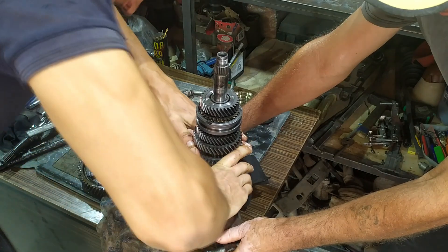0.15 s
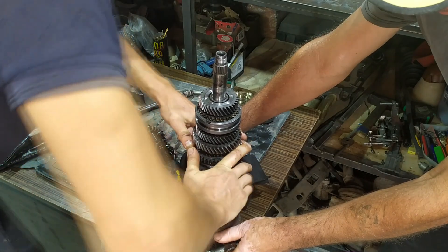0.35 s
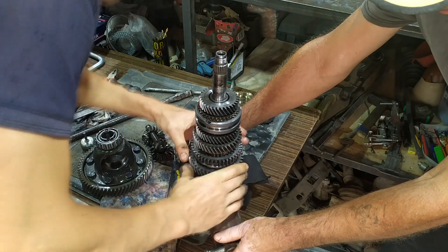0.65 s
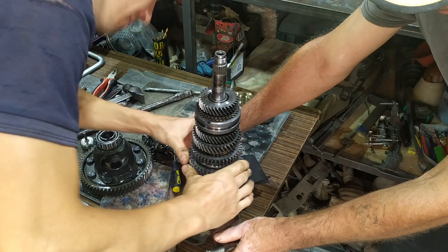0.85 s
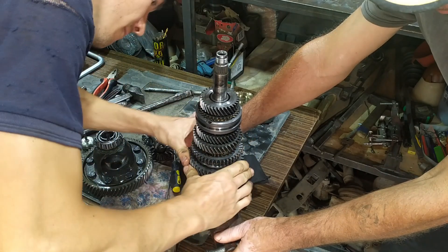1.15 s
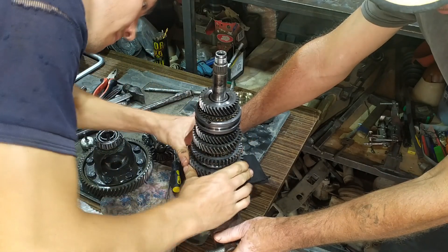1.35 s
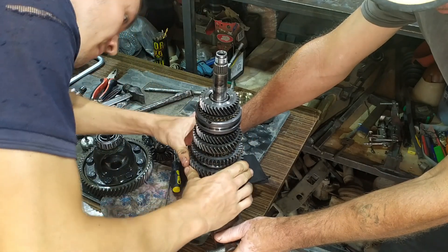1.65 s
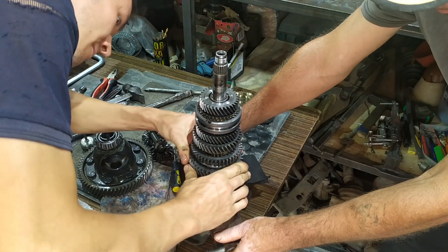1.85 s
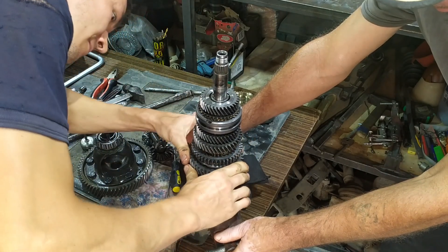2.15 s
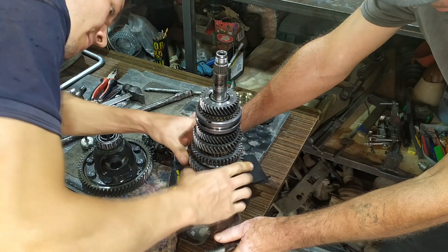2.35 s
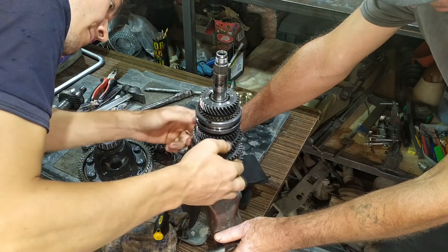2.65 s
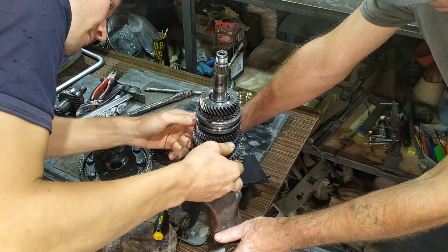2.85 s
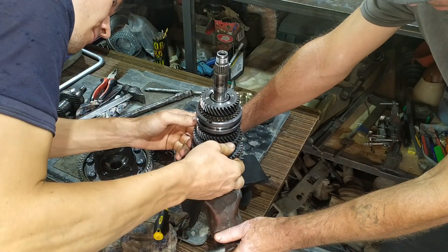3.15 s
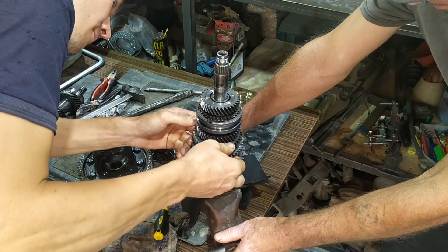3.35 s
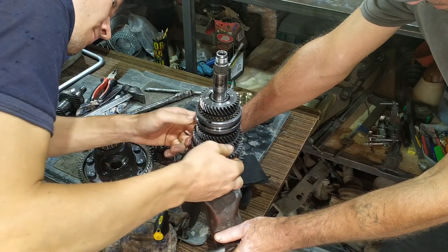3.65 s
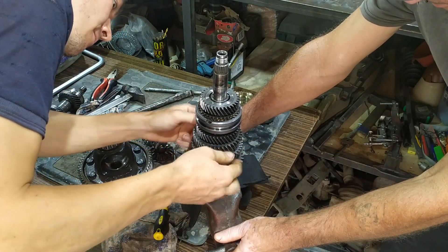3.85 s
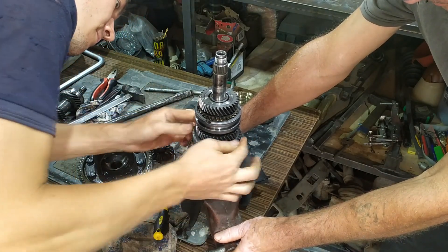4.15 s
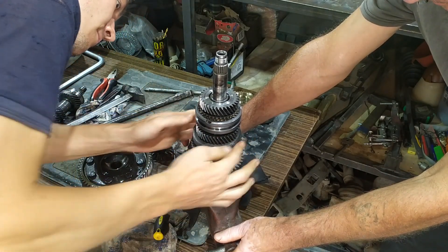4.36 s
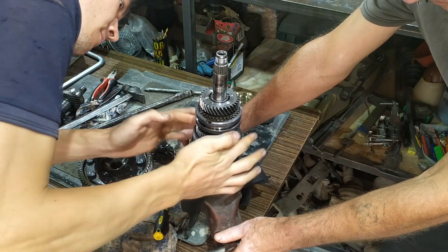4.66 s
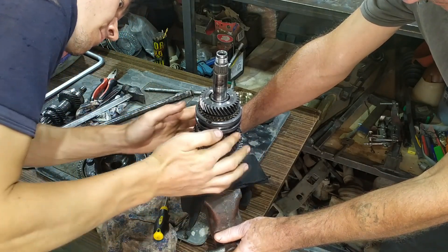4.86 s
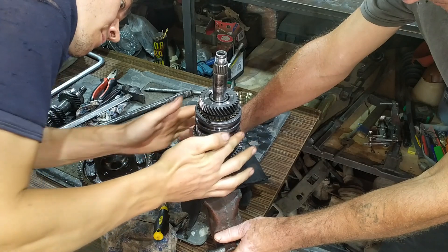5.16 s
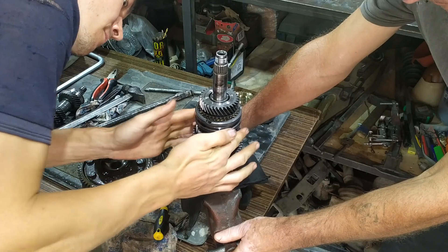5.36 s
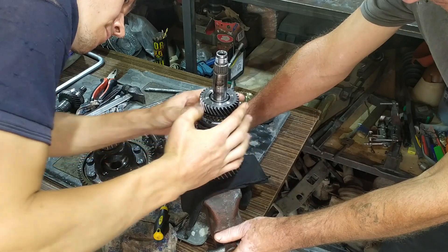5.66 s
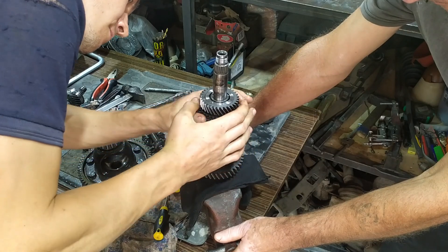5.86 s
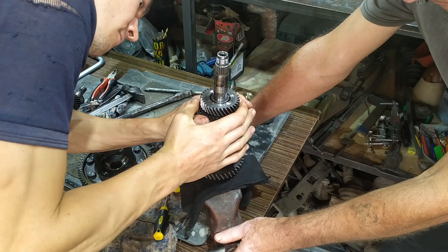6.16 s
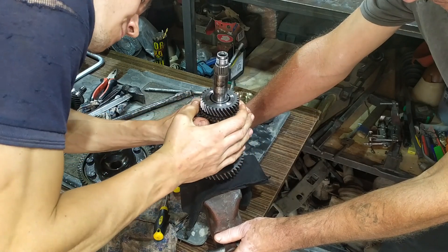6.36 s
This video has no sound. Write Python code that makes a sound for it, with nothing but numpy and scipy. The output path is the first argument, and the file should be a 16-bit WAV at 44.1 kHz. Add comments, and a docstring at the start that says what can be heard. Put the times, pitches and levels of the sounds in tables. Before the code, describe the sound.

A loud, sharp clank of steel gears knocking together opens the sound, left of centre. Hands and cloth scuff faintly over the parts during the first second. From about 0.9 to 2 seconds a steel ring is tapped lightly, around eight small clicks near the centre. At 2.6 seconds a washer chinks and a tool lands on the bench with a thud, bouncing and ringing briefly. At 3.3 seconds a clip snaps on the left with a loud, bright double crack, followed by a smaller click. Faint ticks and rubbing continue, with two clearer dry ticks of gear teeth at 5.1 and 5.3 seconds. At about 6.3 seconds the gears clank loudly again with a quick rattle. The microphone sits on the bench vice in a small garage whose hard walls add short reflections. A quiet, gently swelling low rumble and faint hiss lie underneath.

```python
"""A small hard-walled garage, stereo microphone on the bench vice, far enough back to take in the walls.
Hands work steel rings onto an upright gear shaft. The gear stack is knocked down, a ring is tapped home,
a tool nudges a washer and falls on the bench, a clip snaps, the teeth tick, the stack is knocked again.
Each contact cracks, rings the steel and thuds in the bench. Skin and cloth scuff over the parts,
above a low rumble and a faint hiss."""
import sys
import numpy as np
from scipy import signal
from scipy.fft import rfft, irfft
from scipy.io import wavfile

SR = 44100
rng = np.random.default_rng(int(sys.argv[2]) if len(sys.argv) > 2 else 0)


def file_out(sig):
    """Save sig as 16-bit WAV at sys.argv[1]."""
    # one column per channel
    cols = np.atleast_2d(sig).T
    # limit, then scale
    lim = np.clip(cols, -1, 1)
    pcm = np.round(lim * 32767).astype(np.int16)
    wavfile.write(sys.argv[1], SR, pcm)


N = 286650
LEAD_IN = 512   # samples, room for a knock just before the start

# how alike the room sounds on left and right: frequency_hz, likeness_share
ROOM_LIKENESS = [(150, 1), (500, 0.55), (1200, .25), (4000, .12), (15000, 0.17)]
# contact spectrum of tool and washer: frequency_hz, level_db
TOOL_CRACK = [(120, -33.5), (200, -7), (550, -5), (1400, -3), (3100, 4), (5000, 4), (9000, -6),
              (13000, -24), (16000, -16)]


def amp(db):
    """Decibels to gain."""
    return 10 ** (np.asarray(db) / 20)


def at_hz(points, hz):
    """Read a table on a log-frequency axis."""
    table_hz, values = np.transpose(points)
    return np.interp(np.log(np.maximum(hz, 1)), np.log(table_hz), values)


def tilted_gain(spectrum, tilt_db, size):
    """Gain per FFT bin of a spectrum tilted by tilt_db per octave about 4 kHz."""
    hz = np.fft.rfftfreq(size, 1 / SR)
    return amp(at_hz(spectrum, hz) + tilt_db * np.log2(np.maximum(hz, 200) / 4000))


def coloured(white, spectrum, tilt_db=0):
    """Noise shaped to a spectrum; rms 1."""
    size = white.shape[-1]
    noise = irfft(rfft(white) * tilted_gain(spectrum, tilt_db, size), size)
    return noise / np.sqrt(np.mean(noise ** 2) + 1e-20)


def diffuse(likeness, size):
    """White stereo noise whose sides are alike by the given share at each frequency."""
    mid, side = rfft(rng.standard_normal((2, size)))
    alike = np.clip(at_hz(likeness, np.fft.rfftfreq(size, 1 / SR)), 0, 1)
    return irfft(np.sqrt(1 + alike) * mid + np.sqrt(1 - alike) * side * [[1], [-1]], size)


def click(spectrum, tilt_db, size):
    """The shortest causal pulse with this spectrum (folded cepstrum); energy 1."""
    cepstrum = irfft(np.log(tilted_gain(spectrum, tilt_db, size)), size)
    cepstrum[1:size // 2] *= 2
    cepstrum[size // 2 + 1:] = 0
    pulse = irfft(np.exp(rfft(cepstrum)), size)
    return pulse / np.sqrt(np.sum(pulse ** 2))


def ringing(modes, drive_db, tilt_db, pivot_hz, t):
    """Decaying modes, unevenly struck, neighbours in opposite directions; tilt_db is per octave."""
    hz, level_db, t60_s = np.array(modes).T[:, :, None]
    sign = (-1) ** np.arange(len(modes))[:, None]
    start_db = level_db + drive_db + tilt_db * np.log2(hz / pivot_hz) + rng.normal(0, 2.5, hz.shape)
    return np.sum(sign * amp(start_db - 60 * t / t60_s) * np.sin(2 * np.pi * hz * t), axis=0)


def struck(blows, modes, crack, chatter_db, chatter_t60_s,
           thud_lag_s, thud_tilt_db, pan_left_db, left_lag_samples):
    """Each blow: a sharp crack trailed by chatter, ringing steel, and the bench answering just after."""
    # bench resonances: pitch_hz, level_db, t60_s
    bench_modes = [(185.3, -2, .04), (266, -7.5, 0.047), (440, -4, 0.041), (526.4, 0, 0.03),
                   (695.7, -4.5, .04), (1160, -3, 0.012)]
    size = 8192
    t = np.arange(size) / SR
    out = np.zeros((2, LEAD_IN + N + size))
    for start_s, level_db, tilt_db, thud_db, ringing_db in blows:
        contact = rng.standard_normal(size) ** 3 * amp(chatter_db - 60 * t / chatter_t60_s)
        contact[0] = 1   # the blow itself, ahead of its chatter
        steel = ringing(modes, ringing_db, tilt_db, pivot_hz=4000, t=t)
        bench = ringing(bench_modes, thud_db, thud_tilt_db, pivot_hz=500, t=t)
        bench = np.pad(bench, (round(thud_lag_s * SR), 0))[:size]
        sound = signal.fftconvolve(click(crack, tilt_db, size), contact)[:size] + steel + bench
        for channel, lag in enumerate([left_lag_samples, 0]):
            start = LEAD_IN + round(start_s * SR) + lag
            out[channel, start:start + size] += sound * amp(level_db + pan_left_db * (.5 - channel))
    return out[:, :LEAD_IN + N]


def stack_knocks():
    """The gear stack is knocked down, left of centre; hands and vice damp its ringing."""
    # start_s, level_db, tilt_db_per_octave, thud_db, ringing_db
    knocks = [(-0.006, 5, 0.73, -49.5, -19), (0.004, -24, -1, -22.5, -34), (0.019, -28, 7, -48, -34),
              (0.037, -10, 1.5, -50, -24), (6.338, -32.5, 3, -44, -48), (6.3475, 3.5, 4.5, -33.5, -20),
              (6.3545, 4, -0.14, -37, -24), (6.366, -11, -1.5, -54.5, -25), (6.385, -17, 7, -40, -23),
              (6.402, -6.5, 2, -55, -20), (6.418, -22.5, -2, -49, -37)]
    # gear resonances: pitch_hz, level_db, t60_s
    modes = [(1208.4, -15.5, 0.091), (1966, -10.5, .02), (3560, -11, 0.015), (4350, -6.5, .02),
             (4830, -23, 0.013), (5800, -12, .03), (6880, -7, 0.013), (7490, -6.5, .05), (8590, -8, .05),
             (8855, 2, 0.046), (9180, 0.5, 0.13), (9560, -1, .07), (9300, 6, 0.05), (9240, -6, .08),
             (9370, -2, 0.048), (10823, -5.5, .05), (10960, -1, .05), (11200, -6.5, 0.071)]
    # contact spectrum: frequency_hz, level_db
    crack = [(180, -52), (300, -23.5), (787, -14.5), (1030, -21.5), (1190, -7.5), (2140, -20), (2840, -7.5),
             (4300, -4.5), (6000, -10), (7690, -2), (8360, -15.5), (9090, -11), (10200, -13.5),
             (16000, -26)]
    return struck(knocks, modes, crack, chatter_db=-24.5, chatter_t60_s=0.054,
                  thud_lag_s=0.0016, thud_tilt_db=0, pan_left_db=8, left_lag_samples=2)


def room_tone():
    """A low rumble that swells and sinks, and a steady hiss."""
    # course of the rumble: time_s, level_db
    swell = [(0.0, -54), (0.5, -58.5), (1.3, -60.5), (1.9, -51), (2.8, -57), (3.56, -56), (4.0, -59.5),
             (4.31, -56), (4.65, -58.5), (6.5, -60)]
    # rumble spectrum: frequency_hz, level_db
    rumble_colour = [(12, -68), (20, -37.5), (27, -28), (35, -11.5), (42, -9.5), (70, 4.5), (92, -2),
                     (114, -0.5), (123, -8), (140, -20), (173, -17.5), (217, -27), (260, -25), (340, -51.5),
                     (570, -120)]
    # hiss spectrum: frequency_hz, level_db
    hiss_colour = [(76, -39), (130, -7), (172, 0), (224, -5), (274, -2.5), (303, -7.5), (419, -4),
                   (493, -6.5), (556, -5.5), (1980, -13.5), (9960, -20), (14900, -26), (16200, -31)]
    rumble_likeness = [(35, .55), (70, 1.0), (130, 0.9)]   # frequency_hz, likeness_share
    swell_db = np.interp(np.arange(N) / SR, *np.transpose(swell))
    rumble = amp(swell_db) * coloured(diffuse(rumble_likeness, N), rumble_colour)
    hiss = amp(-65.5) * coloured(diffuse(ROOM_LIKENESS, N), hiss_colour)
    return rumble * amp([[1.1], [-1.1]]) + hiss * amp([[.6], [-.6]])


def hand_scuffs():
    """Dense tiny slips of skin and cloth; each scuff rises fast, holds and fades."""
    # peak_s, hold_s, level_db, bright_share
    scuffs = [(0.338, .012, -61, 0.5), (0.4, .004, -58, 1), (.43, .17, -64.5, 0.62),
              (.608, .012, -55.5, 0.35), (.68, .07, -71, 1), (0.784, .012, -57, 0.68), (.992, .045, -49, 1),
              (1.065, .02, -66, 0), (2.93, .08, -69, 0.34), (4.11, .03, -72, 1), (4.284, .12, -74.5, 1),
              (5.8, .01, -77.5, .9), (5.975, .05, -72.5, 0.46)]
    # friction spectrum: frequency_hz, level_db
    colour = [(150, -9), (300, -2.5), (1200, -4), (2500, -3), (6000, -4), (11000, -5.5), (16000, -20.5)]
    rise_db_per_s, fall_db_per_s = 709, 326
    t, out = np.arange(N) / SR, np.zeros(N)
    slips = rng.standard_normal(N) * amp(2.0 * np.minimum(rng.exponential(1, N), 6))
    dull, bright = coloured(slips, colour, tilt_db=-4), coloured(slips, colour, tilt_db=2.5)
    for peak_s, hold_s, level_db, bright_share in scuffs:
        loss_db = rise_db_per_s * np.maximum(peak_s - t, 0)
        loss_db += fall_db_per_s * np.maximum(t - peak_s - hold_s, 0)
        friction = bright_share * bright + (1 - bright_share) * dull
        out += amp(level_db - np.minimum(loss_db, 200)) * friction
    return np.pad(out * amp([[1.1], [-1.1]]), ((0, 0), (LEAD_IN, 0)))


def ring_taps():
    """A steel ring is tapped home and rocks back, near the centre."""
    # start_s, level_db, tilt_db_per_octave, thud_db, ringing_db
    taps = [(0.9092, -34, -1, -37, -4.5), (1.2009, -25, 0.8, -32.5, -5), (1.3511, -35.5, -3.5, -27.5, -11),
            (1.491, -24.5, 0, -30.5, -5.5), (1.6176, -38.5, -1, -22.5, -5), (1.6329, -34, -0.5, -48, -16),
            (1.7649, -25.5, 2.5, -36, -5.5), (1.922, -39, 2, -26.5, -5), (2.0433, -37.5, -0.5, -30, -0.5)]
    # ring resonances: pitch_hz, level_db, t60_s
    modes = [(3780, -1, .005), (4400, -1, .004), (4900, -4, .004), (7570, -20, .06), (8400, -31, .05),
             (9110, -17, .07)]
    # contact spectrum: frequency_hz, level_db
    crack = [(300, -12), (550, -26), (1100, -10.5), (2000, -5.5), (3000, 1), (4300, -12), (6100, -5.5),
             (9400, -19), (10500, -29), (16000, -23)]
    return struck(taps, modes, crack, chatter_db=-40, chatter_t60_s=0.01,
                  thud_lag_s=0.00556, thud_tilt_db=12.5, pan_left_db=1, left_lag_samples=2)


def washer_nudges():
    """A washer chinks on the left, nudged by the falling tool."""
    # start_s, level_db, tilt_db_per_octave, thud_db, ringing_db
    nudges = [(2.5397, -35, -1.5, -9, -18), (2.610, -24.5, 1.5, -19.5, -10)]
    # washer resonances: pitch_hz, level_db, t60_s
    modes = [(3208, -9, .06), (4880, -6, .08), (7430, 0, .12), (8190, -9, .07), (9932, -7, .08)]
    return struck(nudges, modes, TOOL_CRACK, chatter_db=-19, chatter_t60_s=0.05,
                  thud_lag_s=0.0027, thud_tilt_db=-5, pan_left_db=7, left_lag_samples=4)


def tool_fall():
    """A tool lands on the bench with a thud, bounces and rings."""
    # start_s, level_db, tilt_db_per_octave, thud_db, ringing_db
    bounces = [(2.590, -36, -3, -8, -26), (2.6354, -18.5, 0, -7.5, -7.5), (2.642, -21, -2.2, -21, -23),
               (2.662, -21.5, -1.5, -24, -16)]
    # tool resonances: pitch_hz, level_db, t60_s
    modes = [(1321, 1, 0.063), (1708, -17.5, 0.44), (2112, -12.5, 0.14), (2185, -9.5, 0.25),
             (2500, -23, .07), (2920, -27, 0.025), (3110, 0.5, 0.065), (3620, -10.5, 0.069),
             (4200, -2, 0.1), (4940, -10, 0.1), (5440, -2, 0.13), (5900, 6.5, 0.2), (7036, -18, 0.056),
             (7435, -12, 0.08), (8193, -11, .09), (9200, -21, 0.084), (9100, -8, 0.12), (9970, -3, 0.15),
             (10600, -15, 0.08), (11070, -10, 0.081), (12330, -28, 0.088), (12700, -13, 0.056),
             (13260, -15.5, 0.086)]
    return struck(bounces, modes, TOOL_CRACK, chatter_db=-19.5, chatter_t60_s=0.074,
                  thud_lag_s=0.00193, thud_tilt_db=-1.3, pan_left_db=3, left_lag_samples=4)


def tooth_ticks():
    """Small dry contacts on the gear teeth, well to the left."""
    # start_s, level_db, tilt_db_per_octave, thud_db, ringing_db
    ticks = [(3.0734, -35.5, -2.8, -47, -32), (4.149, -34.5, -3.5, -51, -15), (5.0948, -19, 1, -46, -27),
             (5.2909, -11, 3, -55.5, -29)]
    # tooth resonances: pitch_hz, level_db, t60_s
    modes = [(2220, -8, 0.057), (2596, -3, 0.01), (4500, -13, 0.0084), (11200, 0, 0.012)]
    # contact spectrum: frequency_hz, level_db
    crack = [(350, -43), (600, -22.5), (1050, -13.5), (1510, -5), (2180, -8.5), (3210, -2), (6830, -2),
             (10500, -4.5), (11800, 1), (16000, -31)]
    return struck(ticks, modes, crack, chatter_db=-45, chatter_t60_s=0.0097,
                  thud_lag_s=0.0075, thud_tilt_db=5, pan_left_db=11, left_lag_samples=18)


def clip_snap():
    """A clip snaps over with a bright double crack, well to the left."""
    # start_s, level_db, tilt_db_per_octave, thud_db, ringing_db
    snaps = [(3.238, -47.5, -5, -41, -29), (3.2921, 3.5, 3.5, -48.5, -24.5), (3.3015, 2, 0, -78.5, -28),
             (3.463, -22, -2, -50.5, -14)]
    # clip resonances: pitch_hz, level_db, t60_s
    modes = [(3590, -5.5, 0.021), (4115, -6, 0.036), (4800, -14.5, 0.025), (5780, -16.5, .04),
             (6270, -8.5, 0.034), (9345, -1.5, 0.037), (11320, -4, 0.015)]
    # contact spectrum: frequency_hz, level_db
    crack = [(400, -55), (700, -22), (1380, -16), (2100, -28.5), (3800, -7.5), (5200, -14.5), (7000, -5),
             (9800, -1), (12000, -11.5), (16000, -28)]
    return struck(snaps, modes, crack, chatter_db=-30.5, chatter_t60_s=0.022,
                  thud_lag_s=0.022, thud_tilt_db=-6, pan_left_db=10, left_lag_samples=16)


def garage(direct, wet_db, echoes_db, build_s):
    """Add a few echoes off the near walls and dense reflections that die band by band."""
    # room decay: frequency_hz, t60_s
    decay = [(100, .2), (300, 0.39), (700, .28), (2000, 0.3), (5000, .31), (9000, 0.25), (15000, 0.33)]
    # first reflections: delay_s, level_db
    wall_echoes = [(.0048, 3), (.0088, 2.5), (0.017, -7.5)]
    t, edges_hz = np.arange(24000) / SR, 60 * 2 ** np.arange(0, 8.4, .5)
    white, tail = diffuse(ROOM_LIKENESS, len(t)), 0
    for low, high in zip(edges_hz, edges_hz[1:]):
        band = signal.sosfilt(signal.butter(2, [low, high], "band", fs=SR, output="sos"), white)
        tail += band * amp(-60 * t / at_hz(decay, np.sqrt(low * high)))
    tail *= 1 - np.exp(-t / build_s)
    tail *= amp(wet_db) / np.sqrt(np.sum(tail ** 2) / 2)
    for delay_s, echo_db in wall_echoes:
        for side in tail:   # each capsule meets the echo at its own moment
            side[int((delay_s + rng.uniform(0, .0008)) * SR)] += amp(echoes_db + echo_db)
    reflections = signal.fftconvolve(direct.mean(0, keepdims=True), tail, axes=1)
    return direct + reflections[:, :direct.shape[1]]


def scene():
    """Sounds from different spots reach the microphone with their own patterns of reflections."""
    work = (garage(stack_knocks(), wet_db=2.5, echoes_db=-5, build_s=0.0061)
            + garage(hand_scuffs(), wet_db=-1.5, echoes_db=-6.5, build_s=0.0019)
            + garage(ring_taps(), wet_db=4, echoes_db=-4, build_s=0.00033)
            + garage(washer_nudges() + tool_fall(), wet_db=5.5, echoes_db=-3, build_s=0.0031)
            + garage(tooth_ticks(), wet_db=1.8, echoes_db=-12, build_s=0.0011)
            + garage(clip_snap(), wet_db=4.5, echoes_db=-2.5, build_s=0.0019))
    return work[:, LEAD_IN:] + room_tone()


def record(dry):
    """The microphone drops the deepest bass, the loudest peaks are rounded, the top is cut."""
    low_cut_hz, high_cut_hz = 38, 16650
    trimmed = signal.sosfilt(signal.butter(4, low_cut_hz, "high", fs=SR, output="sos"), dry)
    rounded = 1.2 * np.tanh(trimmed / 1.2)
    return signal.sosfilt(signal.cheby2(16, 70, high_cut_hz, fs=SR, output="sos"), rounded)


dry = scene()
out = record(dry)
file_out(out)
```